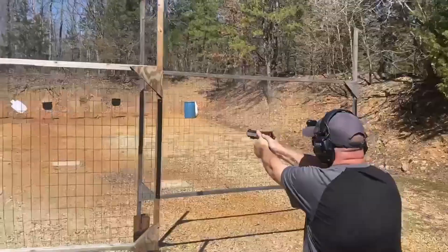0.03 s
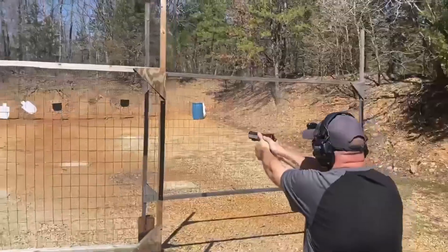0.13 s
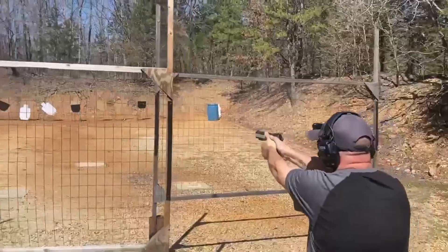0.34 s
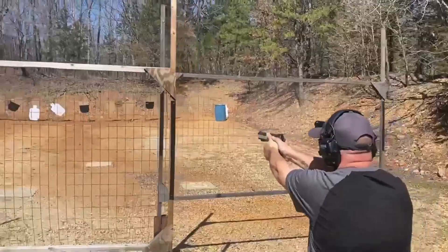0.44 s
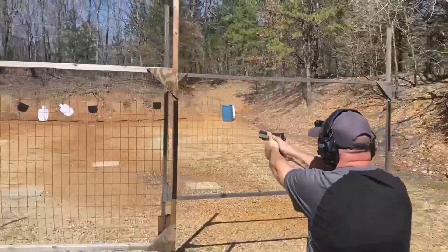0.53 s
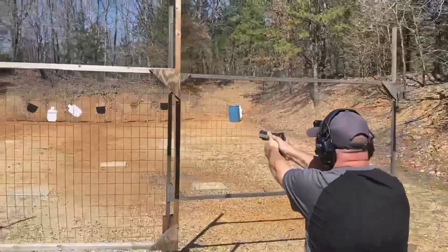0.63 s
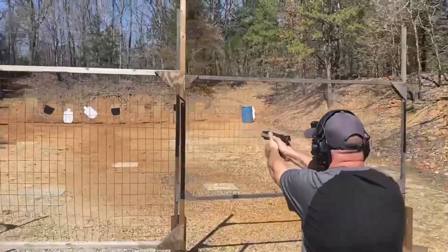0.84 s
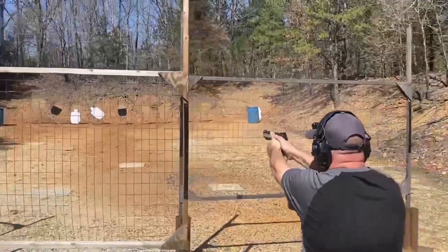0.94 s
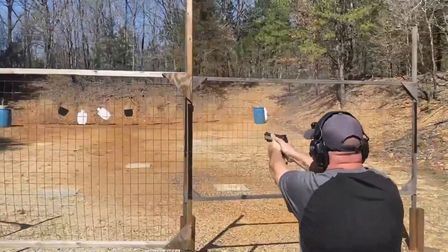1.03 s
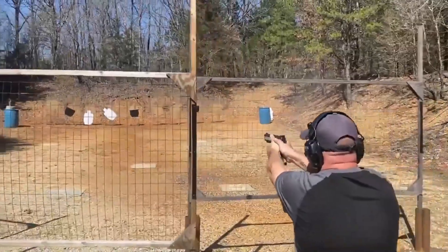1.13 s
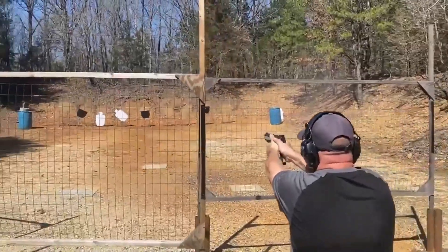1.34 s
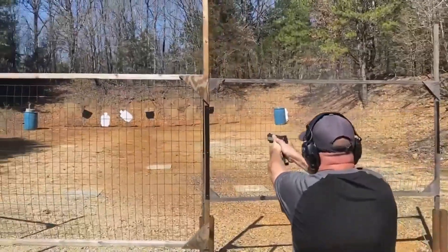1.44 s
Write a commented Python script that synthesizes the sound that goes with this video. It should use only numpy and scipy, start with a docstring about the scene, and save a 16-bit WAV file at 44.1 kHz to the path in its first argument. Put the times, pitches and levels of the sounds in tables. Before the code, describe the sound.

Pistol shots at an outdoor range, two loud close blasts with short echoes off an earth bank

```python
"""A pistol is fired at an outdoor range, a few steps away; the first shot falls just before the start.
Each blast is a burst of noise, short decaying rings and pressure pulses back from an earth bank;
noise that dies band by band makes the near scatter and the roll of the woods.
One far shot (pulses and a wash) falls between the first two; a few casing ticks (resonant puffs)
come between and after the shots, over quiet air."""
import sys
import numpy as np
from scipy import signal
from scipy.fft import rfft, irfft, next_fast_len
from scipy.io import wavfile
from scipy.ndimage import uniform_filter1d

SR = 44100
rng = np.random.default_rng(int(sys.argv[2]) if len(sys.argv) > 2 else 0)


def store_wav(level_fs):
    """Save 16-bit WAV to argv[1]."""
    pcm = np.round(np.clip(np.atleast_2d(level_fs), -1, 1) * 32767)
    wavfile.write(sys.argv[1], SR, pcm.T.astype(np.int16))


N = 66150

# Near shots. Each row: start in seconds, gain in dB, pitch factor of the rings, extra dB of the lowest ring.
# All other levels inside a shot are relative to this gain.
SHOTS = [(-.37, 1, 0.34, .1), (0.234, 1, 1.004, 1), (0.8437, 0, 1.06, -13)]

# Blast noise. Each row: frequency in Hz, relative density in dB per Hz.
CRACK_COLOUR = [(150, -32.5), (520, -28), (800, -10), (1500, -13), (3000, -20), (5000, -24.5),
                (7500, -26.5), (9000, -39), (11000, -26.5), (12500, -50)]
CRACK_DB, CRACK_RISE_S, CRACK_HOLD_S, CRACK_T60_S = -14, 0.00051, 0.0071, 0.073

# First edge. One row: level in dB, length in seconds, pitch in Hz, width in Hz, left over right in dB.
SNAP = (-17.5, .002, 7000, 6995.5, 1)

# Rings of the blast among ground and frames. Each row: frequency in Hz before the pitch factor,
# level in dB, t60 in seconds, left lag in ms, left over right in dB.
RINGS = [(68.5, -17, 0.065, 1.6, 2), (212, -4.5, 0.031, .2, -2.8), (265, -9, .03, .4, 7),
         (435, -21, 0.033, 0.1, -0.5), (676, -4.5, .03, .15, 2.6), (739, -9, 0.053, .1, 0.9),
         (1034, -12, .03, .1, 2), (1232, -13, 0.076, 0.01, -0.6), (1675, -16, 0.082, 0.14, -0.2)]
RING_RISE_S = 0.0022

# Scatter from near ground and fence. Each row: frequency in Hz, relative density in dB per Hz.
NEAR_COLOUR = [(24, -41.5), (40, -11.5), (348, -2), (1440, 3.5), (1620, -2.5), (4550, -14), (7190, -17.5),
               (8720, -36), (11100, -26.5), (12500, -52.5), (16200, -83), (22000, -120)]
# Its decay. Each row: frequency in Hz, t60 in seconds.
NEAR_T60 = [(60, 0.12), (300, 0.57), (1000, 0.34), (5000, 0.49), (11000, 0.6)]
NEAR_DB, NEAR_RISE_S = -24, 0.0017

# Scattered echoes alike after every shot. Each row: delay in seconds, level in dB, length in seconds,
# pitch in Hz, width in Hz, left over right in dB.
SLAPS = [(.058, -41.5, 0.012, 1296, 1534, -6), (0.073, -37, 0.019, 762, 684, 4),
         (0.099, -56.5, .14, 48, 30, -5.5)]

# Roll of the woods. Each row: frequency in Hz, relative density in dB per Hz.
WOODS_COLOUR = [(24, -47), (40, -21.5), (165, -18.5), (309, -23.5), (716, -6), (1000, -17.5), (1160, -13),
                (1960, -21), (5660, -28), (10800, -31.5), (12500, -69), (16200, -101), (22000, -120)]
# Its decay. Each row: frequency in Hz, t60 in seconds.
WOODS_T60 = [(60, 0.93), (200, .7), (600, 0.89), (1500, 0.91), (4000, 0.67), (11000, 0.12)]
WOODS_DB, WOODS_START_S, WOODS_RISE_S = -25, 0.081, 0.11

# Clean returns from the bank: delays after the shot in seconds.
BANK_DELAYS_S = (.1178, .1192)
# Their pulses. Each row: level in dB, pulse width in seconds, left lag in seconds.
BANK_PULSES = [(-22, .0002, 0.00016), (-24.5, .00035, 0.000077)]

# Returns from bank and tree line that differ from shot to shot. Each row: start in seconds, level in dB,
# length in seconds, pitch in Hz, width in Hz, left over right in dB.
VARIED_RETURNS = [(0.3522, -23, 0.0033, 800, 500, 1.5), (.352, -31, 0.0076, 340, 250, 0),
                  (0.3527, -26.5, 0.0026, 4100, 3000, 1), (.3532, -47, 0.0009, 7530, 3980, -4),
                  (0.37, -34.5, 0.0014, 4800, 4000, 1), (.404, -37.5, 0.028, 702, 300, 4),
                  (.428, -33, 0.019, 662, 398, 5), (.475, -44, 0.011, 790, 700, 3),
                  (.9615, -25.5, 0.0041, 1440, 1190, 1.5), (.962, -25.5, 0.0065, 684, 500, 1.5),
                  (0.9616, -28, 0.0046, 336, 250, 5), (.9625, -40.5, 0.0036, 5940, 8000, 2),
                  (.977, -36, 0.0014, 7426, 8000, -4), (.9775, -36, 0.002, 2520, 3870, 12),
                  (1.015, -42, 0.03, 770, 503, 1), (1.037, -30.5, 0.017, 682, 350, 3),
                  (1.075, -47, 0.016, 108, 120, 2), (1.085, -44.5, 0.018, 690, 600, -1)]

# Far shot, direct and off ground and bank. Each row: start in seconds, level in dB,
# pulse width in seconds, left lag in seconds.
FAR_PULSES = [(0.116, -29.5, .00025, 0.00042), (.1182, -29.5, .0005, 0.0002),
              (0.1232, -38.5, .0012, 0.00018)]
# Its wash. Each row: frequency in Hz, relative density in dB per Hz.
FAR_COLOUR = [(24, -46.5), (40, -9), (97, -11.5), (530, -2), (1090, -7), (3170, -20), (7510, -30),
              (9000, -52.5), (11700, -78), (19800, -120)]
FAR_WASH_DB, FAR_RISE_S, FAR_T60_S = -43, 0.011, 1

# Casing ticks. Each row: start in seconds, level in dB, length in seconds, pitch in Hz, width in Hz,
# left over right in dB.
TICKS = [(0.034, -64.5, .03, 10900, 990, -1), (0.571, -70, 0.033, 11000, 1175, 1),
         (0.627, -73, 0.022, 11120, 500, 0), (1.285, -69, 0.0022, 6410, 7000, 1),
         (1.402, -73.5, 0.00213, 5110, 2000, 0), (1.473, -76, 0.0018, 4980, 1500, -1.5)]

# Quiet air of the range. Each row: frequency in Hz, relative density in dB per Hz.
AIR_COLOUR = [(30, -4), (60, -6.5), (120, -11.5), (300, -18), (720, -5), (1500, -16.5), (3000, -25),
              (5000, -43), (8000, -50.5), (10500, -48.5), (12500, -61)]
AIR_DB, AIR_PATCHY_DB, AIR_FLICKER_DB = -63, 1.2, 0.4

# Stereo likeness of all noise tails. Each row: frequency in Hz, left-right correlation.
LIKENESS = [(60, 0.32), (170, 1), (500, 0.15), (1460, 0.035), (4240, 0.83), (12300, 0.54)]

# Microphone chain
LAG_AT_1K_S, LAG_POWER, LAG_KNEE_HZ = 0.0015, 0.95, 48.7
LOW_CUT_HZ, TOP_HZ, BAND_EDGE_HZ = 47, 11700, 12850
SOFT_CEILING = 1.4

STEADY = [(1, 1e3), (2, 1e3)]  # (Hz, t60 s): practically no decay


def shot(pitch, lowest_db):
    """One near shot: the blast at once, then slaps and the swelling woods, then sharp bank returns on top."""
    out = woods()
    add(out, 0, near_scatter())
    add(out, 0, crack())
    add(out, 0, rings(pitch, lowest_db))
    add(out, 0, snap())
    for delay_s, *slap in SLAPS:
        add(out, delay_s, burst(*slap, shared=0.5))
    for delay_s, bank_pulse in zip(BANK_DELAYS_S, BANK_PULSES):
        add(out, delay_s, pulse(*bank_pulse))
    return out


def crack():
    """Blast noise: fast rise, short hold, the same decay in all bands."""
    noise = tail(CRACK_COLOUR, STEADY, patchy_db=1.0)
    count = noise.shape[1]
    past_hold_s = np.maximum(np.arange(count) / SR - CRACK_HOLD_S, 0)
    fall = gain_of(CRACK_DB - 60 * past_hold_s / CRACK_T60_S)
    return noise * rise(0, CRACK_RISE_S, count) * fall


def snap():
    """First edge of the blast: a wideband puff reaching the two channels in opposite phase."""
    return burst(*SNAP, shared=1.0) * [[1], [-1]]


def rings(pitch, lowest_db):
    """Short resonances of ground and frames: decaying sines, delayed on the left."""
    count = SR // 4
    out = np.zeros((2, count))
    for k, (hz, db, t60_s, lag_ms, pan_db) in enumerate(RINGS):
        lag_s = np.array([[lag_ms / 1000], [0]])
        t = np.maximum(np.arange(count) / SR - lag_s, 0)
        level_db = db + sides_db(pan_db) + (lowest_db if k == 0 else 0)
        out += gain_of(level_db - 60 * t / t60_s) * np.sin(2 * np.pi * hz * pitch * t)
    return out * rise(0, RING_RISE_S, count)


def near_scatter():
    """Scatter from near ground and fence: dense noise that starts almost at once."""
    noise = tail(NEAR_COLOUR, NEAR_T60, patchy_db=2.5)
    return gain_of(NEAR_DB) * noise * rise(0, NEAR_RISE_S, noise.shape[1])


def woods():
    """Roll of the woods: noise that enters late, swells and dies band by band."""
    noise = tail(WOODS_COLOUR, WOODS_T60, patchy_db=1.55)
    return gain_of(WOODS_DB) * noise * rise(WOODS_START_S, WOODS_RISE_S, noise.shape[1])


def add_varied_returns(mix):
    """Reflections from bank and tree line, different from shot to shot: resonant puffs."""
    for start_s, *puff in VARIED_RETURNS:
        add(mix, start_s, burst(*puff, shared=0.74))


def add_far_shot(mix):
    """Distant shot: direct and reflected pressure pulses over a decaying wash."""
    wash = tail(FAR_COLOUR, [(1, FAR_T60_S), (2, FAR_T60_S)], patchy_db=1.5)
    wash = gain_of(FAR_WASH_DB) * wash * rise(0, FAR_RISE_S, wash.shape[1])
    add(mix, FAR_PULSES[0][0], wash)
    for start_s, *far_pulse in FAR_PULSES:
        add(mix, start_s, pulse(*far_pulse))


def add_casing_ticks(mix):
    """Faint casing ticks: short, high resonant puffs."""
    for start_s, *tick in TICKS:
        add(mix, start_s, burst(*tick, shared=0.74))


def air():
    """Quiet air of the range: coloured noise, slightly uneven, practically without decay."""
    noise = tail(AIR_COLOUR, STEADY, AIR_PATCHY_DB, AIR_FLICKER_DB, size=2048)
    return gain_of(AIR_DB) * noise[:, :N]


def pulse(db, width_s, lag_s):
    """A pressure pulse: push, then suction; its edge is rounded by the air."""
    t = np.arange(SR // 20) / SR - np.array([[lag_s], [0]])
    u = t / width_s
    return gain_of(db) * (u > 0) * 1.9 * u * (2 - u) * np.exp(-abs(u))


def burst(db, length_s, hz, width_hz, pan_db, shared):
    """A puff of noise through one resonance, applied twice; its envelope peaks at a third of its length."""
    t = np.arange(round(4 * length_s * SR) + 200) / SR
    common, *sides = rng.standard_normal((3, len(t)))
    noise = shared * common + np.sqrt(1 - shared ** 2) * np.array(sides)
    r = np.exp(-np.pi * width_hz / SR)
    poles = [1, -2 * r * np.cos(2 * np.pi * hz / SR), r * r]
    for _ in range(2):
        noise = signal.lfilter([1, 0, -1], poles, noise)
    u = 3 * t / length_s
    return gain_of(db + sides_db(pan_db)) * evened(noise) * u * np.exp(1 - u)


def tail(colour, t60, patchy_db, flicker_db=1.0, size=512):
    """About two seconds of coloured stereo noise, each band dying at its own speed; rms 1 before decay."""
    hop = size // 4
    frames, hz = 2 * SR // hop, np.fft.rfftfreq(size, 1 / SR)
    a, b, c, d, patches = rng.standard_normal((frames, len(hz), 5)).T
    patches = uniform_filter1d(patches, size=5, axis=0)
    patches = evened(uniform_filter1d(patches, size=5, axis=1))
    # uneven returns, all bands at once
    flicker = evened(uniform_filter1d(rng.standard_normal(frames), size=3))
    same = np.clip(read(LIKENESS, hz), -1, 1)[:, None]
    left = a + 1j * b
    right = same * left + np.sqrt(1 - same ** 2) * (c + 1j * d)
    level_db = read(colour, hz)[:, None] + patchy_db * patches + flicker_db * flicker
    z = np.array([left, right]) * gain_of(level_db)
    steady = signal.istft(z, nperseg=size, noverlap=size - hop)[1]
    frame_s = np.arange(frames) * hop / SR
    fall = gain_of(-60 * frame_s / read(t60, hz)[:, None])
    return signal.istft(z * fall, nperseg=size, noverlap=size - hop)[1] / steady.std()


def rise(start_s, length_s, count):
    """A smooth step from 0 to 1."""
    t = np.arange(count) / SR
    return np.sin(np.pi / 2 * np.clip((t - start_s) / length_s, 0, 1)) ** 2


def gain_of(db):
    """Amplitude factor of a level in dB."""
    return 10 ** (np.asarray(db) / 20)


def sides_db(pan_db):
    """Left and right dB offsets, half the difference each."""
    return np.array([[pan_db / 2], [-pan_db / 2]])


def evened(x):
    """Scales to rms 1."""
    return x / np.sqrt(np.mean(x ** 2) + 1e-20)


def read(points, hz):
    """Interpolates a table over log frequency."""
    f, value = np.transpose(points)
    return np.interp(np.log(hz + 1), np.log(f + 1), value)


def add(mix, start_s, sound):
    """Mixes a two-channel sound in at a time that may lie before zero."""
    at = round(start_s * SR)
    sound = sound[:, max(-at, 0):]
    part = mix[:, max(at, 0):][:, :sound.shape[1]]
    part += sound[:, :part.shape[1]]


def scene():
    """Near shots, their varied returns, far shot and ticks over the air."""
    mix = air()
    for start_s, db, *voice in SHOTS:
        add(mix, start_s, gain_of(db) * shot(*voice))
    add_far_shot(mix)
    add_varied_returns(mix)
    add_casing_ticks(mix)
    return mix


def record(dry):
    """Microphone chain: bass and top cut, low tones later than high; soft clipping; band limit."""
    size = next_fast_len(N + SR // 2)
    hz = np.fft.rfftfreq(size, 1 / SR)
    low_cut = 1 / np.sqrt(1 + (LOW_CUT_HZ / (hz + 1)) ** 8)
    top_cut = 1 / np.sqrt(1 + (hz / TOP_HZ) ** 60)
    lag_s = LAG_AT_1K_S * (1000 / np.maximum(hz, LAG_KNEE_HZ)) ** LAG_POWER
    phase = -2 * np.pi * np.cumsum(lag_s) * hz[1]  # group delay summed to phase
    response = low_cut * top_cut * np.exp(1j * phase)
    spread = irfft(rfft(dry, size) * response, size)[:, :N]
    limited = SOFT_CEILING * np.tanh(spread / SOFT_CEILING)
    band = signal.firwin(511, BAND_EDGE_HZ, window=("kaiser", 9), fs=SR)
    return signal.oaconvolve(limited, band[None], "same")


dry = scene()
out = record(dry)
store_wav(out)
```